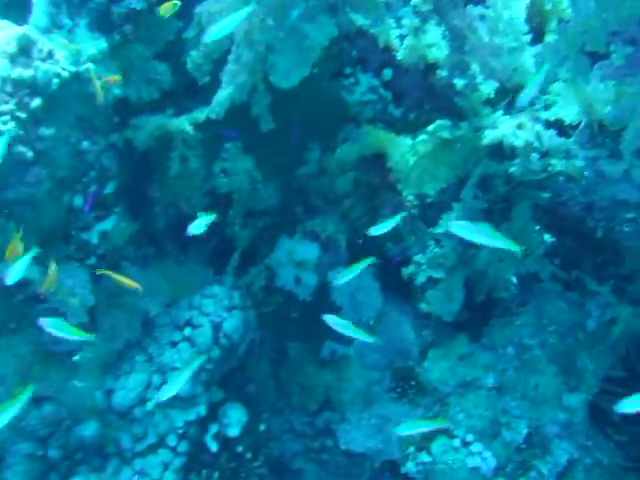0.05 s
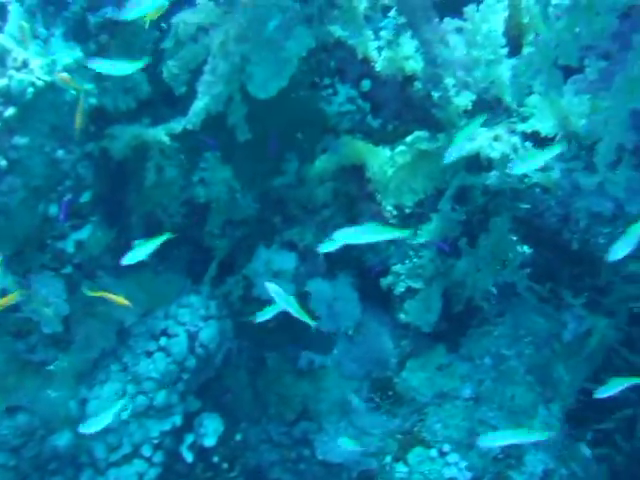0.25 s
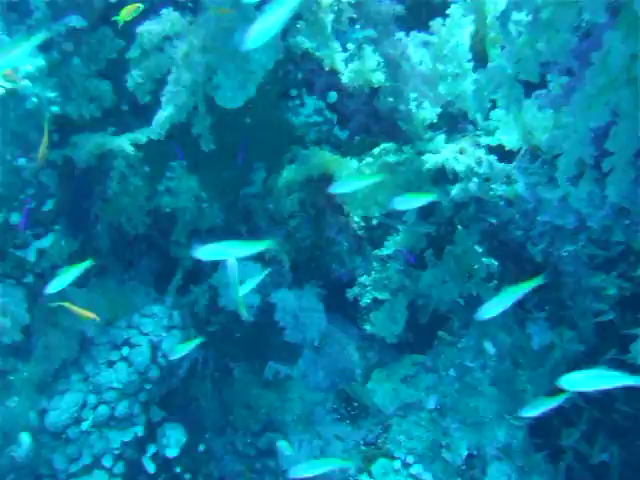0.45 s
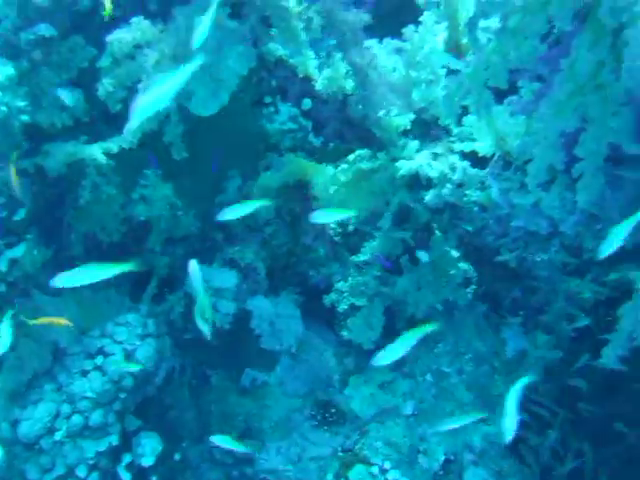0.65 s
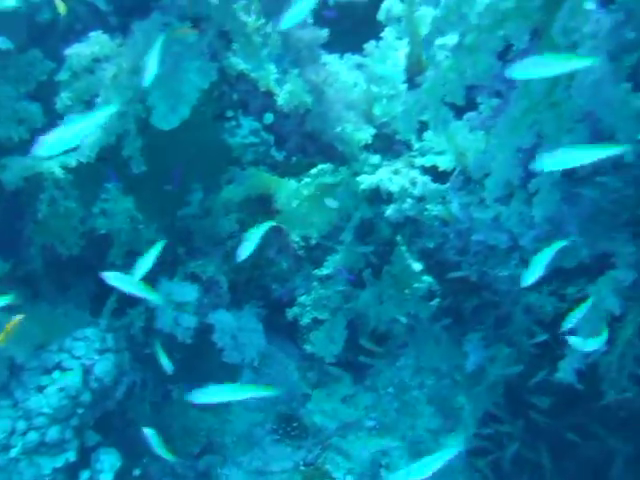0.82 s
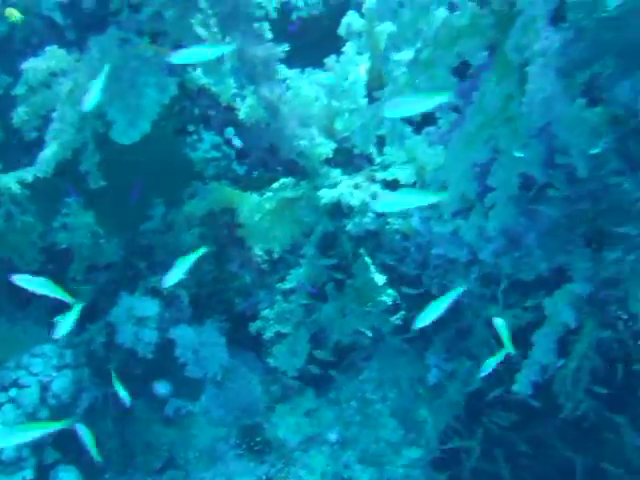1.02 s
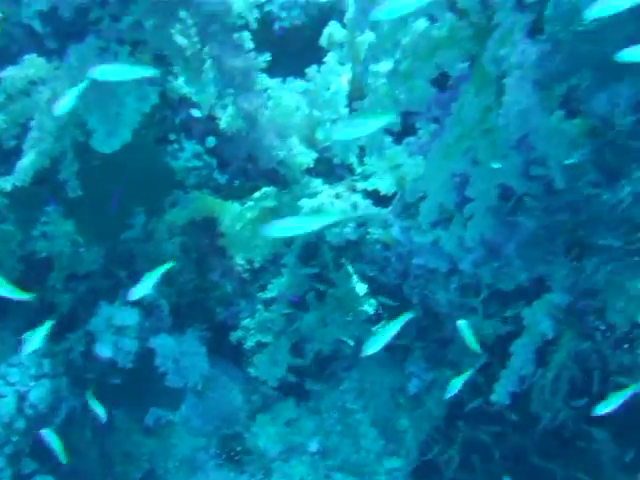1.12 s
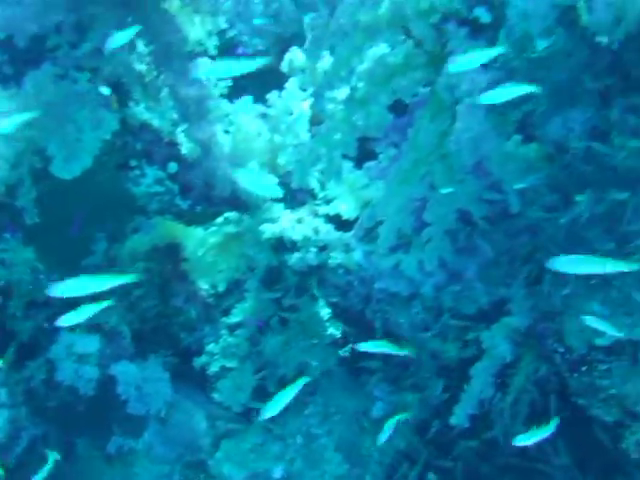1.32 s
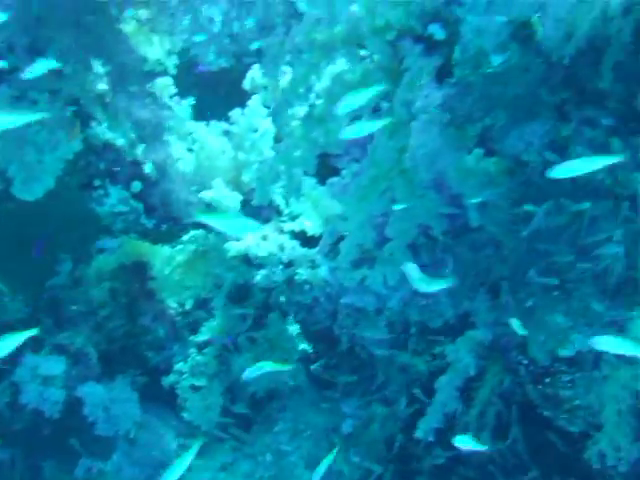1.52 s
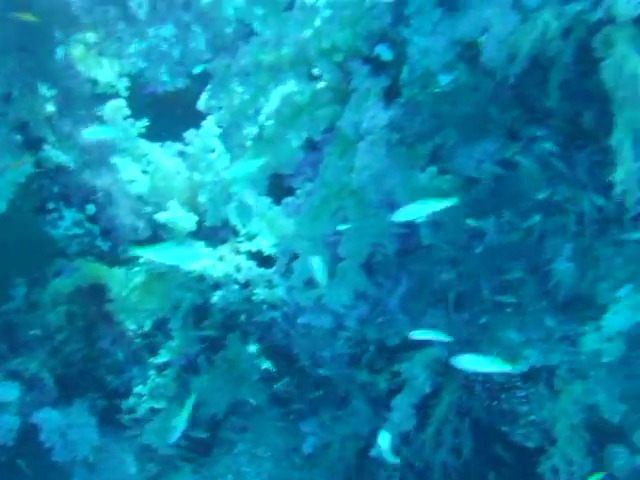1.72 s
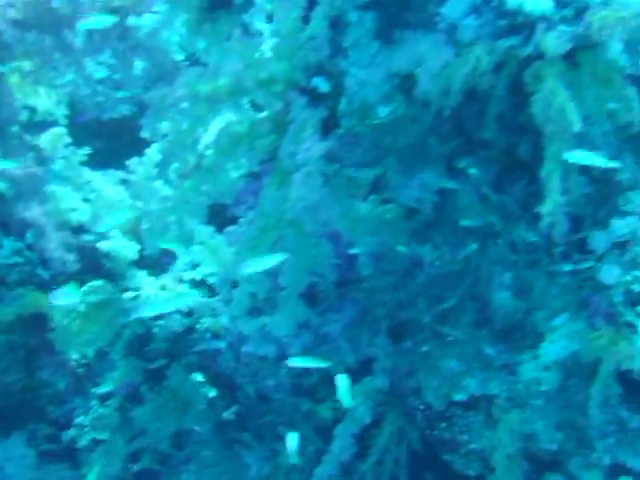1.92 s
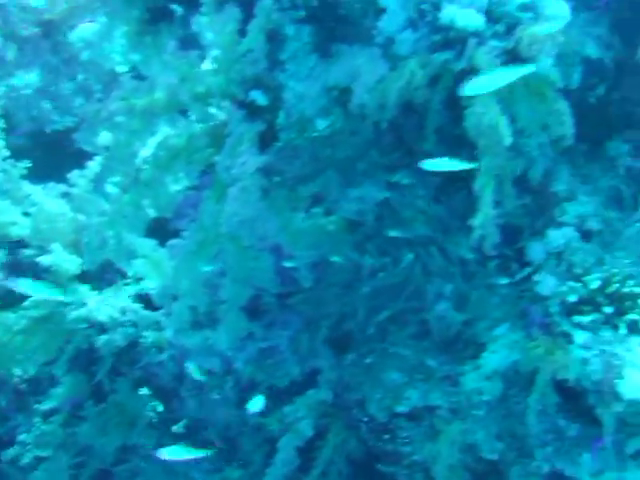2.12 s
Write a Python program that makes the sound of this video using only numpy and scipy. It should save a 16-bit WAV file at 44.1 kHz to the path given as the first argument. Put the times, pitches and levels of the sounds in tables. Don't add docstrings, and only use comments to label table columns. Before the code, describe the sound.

Hollow underwater murmur and bubbling run throughout over even hiss; a sharp plasticky-metallic click snaps early, then a cluster of dull bumps and bubble plops midway, heard close and muffled inside a sealed camera housing on a reef.

```python
import sys
import numpy as np
from scipy import signal
from scipy.fft import rfft, irfft
from scipy.io import wavfile
from scipy.ndimage import uniform_filter1d

SR = 44100
rng = np.random.default_rng(int(sys.argv[2]) if len(sys.argv) > 2 else 0)


def attenuation_scalar(level_db):
    decades = np.asarray(level_db, float) / 20
    return 10 ** decades


def file_out(sig):
    cols = np.atleast_2d(sig).T
    lim = np.clip(cols, -1, 1)
    pcm = np.round(lim * 32767).astype(np.int16)
    wavfile.write(sys.argv[1], SR, pcm)


N = 94815


def ring(x, hz, width):
    return signal.lfilter(*signal.iirpeak(hz, hz / width, fs=SR), x)


def level(x, db):
    return x * attenuation_scalar(db) / np.sqrt(np.mean(x ** 2))


def high_pass(x, order, hz):
    return signal.sosfilt(signal.butter(order, hz, "high", fs=SR, output="sos"), x)


def colour(points):
    points_hz, points_db = np.array(points, float).T
    hz = np.maximum(np.fft.rfftfreq(N, 1 / SR), 1)
    gain = attenuation_scalar(np.interp(np.log(hz), np.log(points_hz), points_db))
    return irfft(rfft(rng.standard_normal(N)) * gain, N)


def walk(rate):
    span = int(SR / rate)
    wander = uniform_filter1d(uniform_filter1d(rng.standard_normal(N), span), span)
    return wander / wander.std()


def add(out, s, wave):
    i = max(int(s * SR), 0)
    out[i:i + len(wave)] += wave[:max(N - i, 0)]


def tone(db, hz, t60, rise, glide):
    t = np.arange(int(t60 * SR) + 8) / SR
    envelope = attenuation_scalar(db - 60 * t / t60) * (1 - np.exp(-t / rise))
    return envelope * np.sin(2 * np.pi * hz * t * (1 + glide * t))


def noise_burst(length, t60):
    return rng.standard_normal(length) * attenuation_scalar(-60 * np.arange(length) / SR / t60)


def preamplifier_hiss():
    # frequency in Hz, spectral level in dB per Hz.
    hiss_spectrum = [(300, -2), (1500, 7), (2500, -1), (4000, -1.5), (7000, -2), (8000, -3.5), (8600, -33),
                     (9200, -36.5)]
    return level(colour(hiss_spectrum), -51.5)


def electronic_whine():
    # frequency in Hz, rms level in dB.
    whine_lines = [(7860, -73), (7887, -77), (8113, -77), (8140, -78)]
    t = np.arange(N) / SR
    return sum(attenuation_scalar(db + 3) * np.sin(2 * np.pi * hz * t) for hz, db in whine_lines)


def shell_rumble():
    # frequency in Hz, spectral level in dB per Hz.
    rumble_spectrum = [(12, -28), (30, -13.5), (50, -19), (95, -18), (135, -9), (300, -8.5), (450, -2.5),
                       (700, -39)]
    return level(colour(rumble_spectrum), -50) * attenuation_scalar(1.5 * walk(5))


def far_bubbles():
    cloud = np.zeros(N)
    bubbles_per_s, low_hz, high_hz = 1300, 300, 2300
    draw = rng.random((4000, 3))
    starts = np.cumsum(-np.log(draw[:, 0])) / bubbles_per_s
    for s, smallness, distance in zip(starts, draw[:, 1], draw[:, 2]):
        if s < N / SR:
            hz = low_hz * (high_hz / low_hz) ** smallness
            t60 = 4.76 * 3 / hz
            add(cloud, s, tone(-3 * np.log(0.085 + distance), hz, t60, 0.00013, 1.3))
    return cloud


def water():
    # resonance in Hz, width in Hz, level in dB.
    air_modes = [
        (631.6, 54, -2.5),
        (1064, 266, -2),
        (1788, 200, -5),
        (552, 117, -9.5),
        (1510, 2100, -10.5),
    ]
    # time in seconds, level of the low resonances in dB, level of the upper resonances in dB.
    activity_table = np.array([(0.0, -40.5, -48), (0.26, -38, -48), (0.45, -41.5, -47.5),
                               (0.68, -40.5, -53), (0.92, -41, -50), (1.02, -36, -51.5),
                               (1.17, -37.5, -48.5), (1.41, -37, -48), (1.57, -40.5, -47),
                               (1.76, -40.5, -45.5), (2.15, -40, -53)])
    wash = rng.standard_normal(N) + ring(rng.standard_normal(N), 500, 550) * 3
    drive = level(far_bubbles(), 0) + level(wash, -7.5)
    grain = 1.7 * walk(110)
    out = np.zeros(N)
    for hz, width, db in air_modes:
        upper = hz > 900
        activity = np.interp(np.arange(N) / SR, activity_table[:, 0], activity_table[:, 2 if upper else 1])
        swing = activity + 0.5 * walk(3.5) + upper * grain
        mode = ring(ring(drive, hz, width), hz, width * 4.75)
        out += attenuation_scalar(db + swing) * level(mode, 0)
    return out


def shell_groan():
    # start in seconds, length in seconds, level in dB, pitch in Hz.
    groan_event = (.5, .26, -57, 83)
    out = np.zeros(N)
    s, length, db, hz = groan_event
    t = np.arange(int(length * SR)) / SR
    swell = np.sin(np.pi * t / length) ** .5
    add(out, s, attenuation_scalar(db) * swell * np.sin(2 * np.pi * hz * t))
    return out


def shrimp():
    # start in seconds, peak level in dB, centre frequency in Hz.
    snap_events = [(.113, -43, 5600), (.590, -33, 5400), (1.201, -41, 7200), (1.535, -35, 6400),
                   (1.765, -42, 5000)]
    out = np.zeros(N)
    for s, db, hz in snap_events:
        burst = noise_burst(400, 0.013)
        add(out, s, attenuation_scalar(db + 4.5) * ring(ring(burst, hz, 2200), hz, 2600))
    return out


def hand_bumps():
    # start in seconds, peak level in dB, pitch in Hz, ring t60 in seconds.
    bump_events = [(0.581, -49.5, 300, 0.088), (0.701, -51.5, 130, 0.15), (0.911, -50, 138, 0.077),
                   (0.997, -22, 300, 0.011), (1.007, -38.5, 236, 0.039), (1.025, -31.5, 400, 0.035),
                   (1.041, -34, 199, 0.028), (1.0571, -23.5, 259, 0.018), (1.06, -34, 344, 0.022),
                   (1.072, -47.5, 300, 0.054), (1.097, -30, 300, 0.015), (1.2909, -26.5, 214, 0.017),
                   (1.401, -37, 339, 0.094), (1.404, -37.5, 1053, 0.038), (1.402, -43, 1490, 0.055),
                   (1.61, -44.5, 285, 0.11), (1.695, -39.5, 199, 0.035), (1.72, -52.5, 163.4, 0.51),
                   (2.029, -47.5, 284, 0.12)]
    out = np.zeros(N)
    for s, db, hz, t60 in bump_events:
        add(out, s, tone(db + 8.5, hz, t60, 0.0016, 0))
    return high_pass(out, 1, 85)


def latch():
    # mode in Hz, level in dB, t60 in seconds.
    latch_modes = [(972, -10.5, 0.017), (1165, 0.5, 0.033), (1630, -4.5, .03), (1760, -10.5, 0.019),
                   (2190, -4, 0.027), (2577, -1, 0.027), (2830, -3, 0.021), (3370, -5, 0.0095),
                   (4500, -12.5, .014), (5000, -8.5, 0.021), (5756, -14.5, 0.02), (6090, -8.5, 0.016),
                   (6580, -5, 0.016), (7236, -7, 0.014)]
    # start in seconds, strength in dB, brightest frequency in Hz, rattle length in seconds.
    contact_events = [(0.3906, -27, 6300, 0.00096), (.3925, -30.5, 5600, 0.0004),
                      (0.3952, -15, 1140, 0.00063), (0.3978, -20.5, 2300, 0.00095),
                      (.3998, -21.5, 4500, 0.00055), (0.4007, -17.5, 1205, 0.0005),
                      (0.402, -11, 2780, .0004), (.4024, -11, 6680, .0003), (.4041, -12, 3500, .0002),
                      (0.4060, -22.5, 3500, 0.0005), (.4078, -17, 5900, .0004),
                      (0.4096, -17, 1050, 0.00044), (.4113, -20, 1200, 0.0005),
                      (0.415, -28.5, 1700, 0.0013), (0.4199, -22.5, 2760, 0.00049),
                      (.4203, -31.5, 8020, 0.00025), (0.4252, -31.5, 2700, 0.00049)]
    fall_db_per_octave, scatter_db, detune = 5.5, 2, 0.005
    out = np.zeros(N)
    for s, db, bright_hz, length in contact_events:
        draw = rng.standard_normal((len(latch_modes), 2))
        for (hz, mode_db, t60), (scatter, lag) in zip(latch_modes, draw):
            octaves_away = abs(np.log2(hz / bright_hz))
            gain_db = db + mode_db - fall_db_per_octave * octaves_away
            gain_db += scatter_db * np.clip(scatter, -1, 1)
            mode_hz = hz * (1 + detune * scatter * np.sign(lag))
            delay = length * min(abs(lag), 2) / 2
            add(out, s + delay, tone(gain_db, mode_hz, t60, 0.00012, 0))
        crack = high_pass(attenuation_scalar(db - 8) * noise_burst(900, .005), 2, 700)
        add(out, s, ring(crack, bright_hz, bright_hz * 1.7))
    out = high_pass(out, 1, 600)
    add(out, .402, tone(-45, 19, 0.3, .003, 0))
    return out


def small_bubbles():
    # start in seconds, peak level in dB, pitch in Hz, ring t60 in seconds.
    fizz_events = [(.101, -45, 2900, .012), (.338, -42, 1900, .02), (.341, -46, 2700, .015),
                   (.352, -43, 1850, .02), (.460, -43, 1880, .025), (.813, -45, 3100, .015),
                   (1.016, -41, 1600, .012), (1.062, -46, 4200, .015), (1.084, -39, 1800, .015),
                   (1.096, -38, 1750, .02), (1.124, -40, 1800, .02), (1.159, -40, 1800, .015),
                   (1.204, -40, 1620, .03), (1.287, -35, 2880, .016), (1.288, -40, 2000, .008),
                   (1.300, -43, 3500, .014), (1.321, -33, 3950, .016), (1.328, -43, 4000, .01),
                   (1.305, -46, 4200, .008), (1.369, -46, 3500, .008), (1.515, -42, 1950, .025),
                   (1.598, -42, 1880, .025), (1.354, -42, 2800, .01), (1.357, -37, 3330, .024),
                   (1.367, -42, 2650, .012), (1.544, -38, 1800, .04), (1.553, -46, 3400, .012),
                   (1.569, -39, 1800, .03), (1.690, -45, 3350, .015), (1.895, -39, 1920, .035),
                   (1.980, -40, 1850, .02)]
    out = np.zeros(N)
    for s, db, hz, t60 in fizz_events:
        add(out, s, tone(db + 3, hz, t60, 0.00042, 1.8))
    return out


def near_bubbles():
    # start in seconds, peak level in dB, pitch in Hz, ring t60 in seconds.
    bubble_events = [(.050, -27, 610, 0.081), (.084, -33.5, 599, 0.08), (.100, -32, 627, 0.072),
                     (.131, -33, 626, 0.053), (.159, -28, 623, 0.077), (.222, -43, 630, 0.024),
                     (.243, -28.5, 660, 0.057), (.2558, -16, 634, 0.08), (.266, -33, 625, 0.12),
                     (.274, -24, 603, 0.046), (.289, -26.5, 602.5, 0.078), (.313, -31, 555, .1),
                     (.378, -30, 621, 0.043), (.603, -29, 650, 0.031), (.722, -30, 607, 0.066),
                     (.762, -32, 624, 0.066), (.787, -27.5, 637, 0.057), (.803, -25, 619, 0.041),
                     (.820, -27.5, 623, 0.047), (.997, -20.5, 594, 0.025), (1.007, -29.5, 574, 0.068),
                     (1.034, -18, 534, 0.01), (1.064, -27, 630, 0.071), (1.097, -28, 614, 0.086),
                     (1.116, -32, 650, 0.063), (1.1238, -25, 636, 0.06), (1.1300, -25, 641, 0.055),
                     (1.168, -20, 677, 0.026), (1.2035, -20, 614.6, 0.099), (1.291, -15, 602, 0.026),
                     (1.306, -21, 631, 0.08), (1.314, -32, 660, 0.1), (1.378, -34, 622, 0.093),
                     (1.402, -21.5, 635, 0.043), (1.466, -33, 620, 0.11), (1.518, -33.5, 631, 0.06),
                     (1.546, -26.5, 693, 0.048), (1.568, -24, 623, 0.026), (1.591, -24, 638, 0.042),
                     (1.635, -31.5, 645, 0.098), (1.672, -31, 656.5, .12), (1.755, -28.5, 638, 0.062),
                     (1.818, -29, 626.5, 0.1), (1.850, -30, 623, 0.1), (1.876, -28, 628, 0.063),
                     (1.892, -32.5, 630, 0.047), (1.908, -34, 643, 0.13), (1.952, -32, 657, 0.059),
                     (2.030, -30, 626, 0.045), (2.077, -31, 651, 0.11)]
    out = np.zeros(N)
    for s, db, hz, t60 in bubble_events:
        add(out, s, tone(db + 1.0, hz, t60, 0.0016, .6))
    return out


def scene():
    background = water() + shell_rumble() + shell_groan() + shrimp()
    return np.array([background + hand_bumps() + latch() + small_bubbles() + near_bubbles()])


def band_limit(x):
    return signal.sosfilt(signal.butter(12, 8960, fs=SR, output="sos"), x)


def record(dry):
    headroom, offset = .95, -.0024
    rounded = headroom * np.tanh(dry / headroom)
    top_cut = signal.cheby1(14, .5, 8600, fs=SR, output="sos")
    mix = signal.sosfilt(top_cut, rounded) + preamplifier_hiss() + electronic_whine() + offset
    return band_limit(mix)


dry = scene()
out = record(dry)
file_out(out)
```